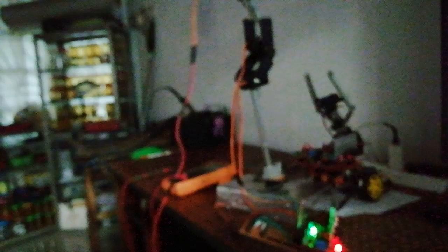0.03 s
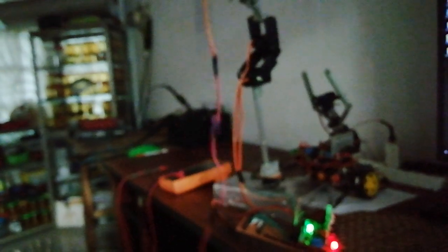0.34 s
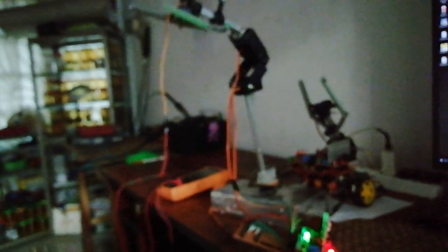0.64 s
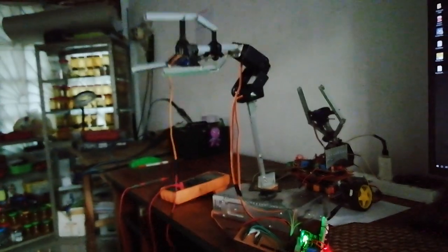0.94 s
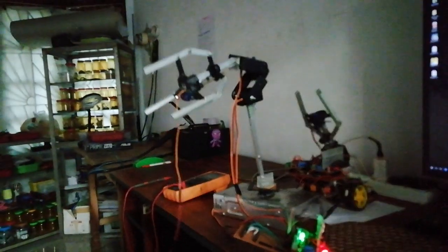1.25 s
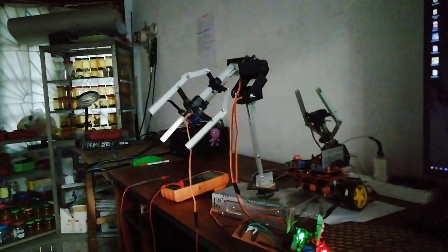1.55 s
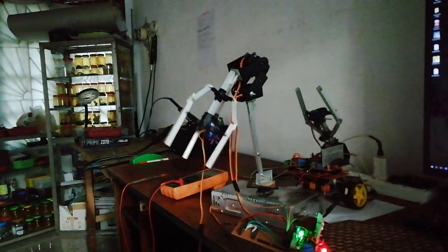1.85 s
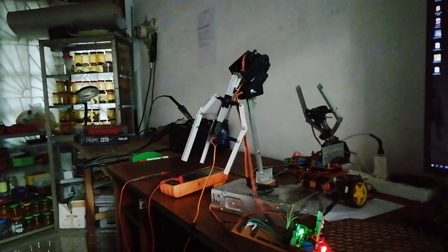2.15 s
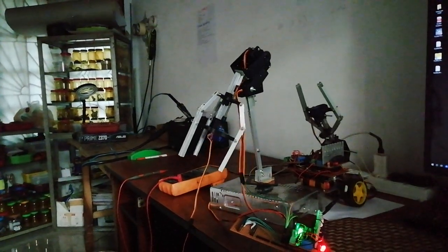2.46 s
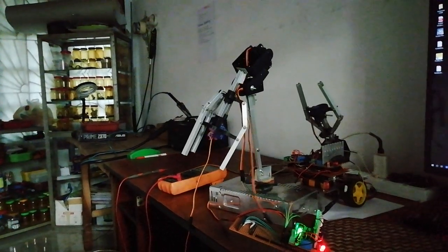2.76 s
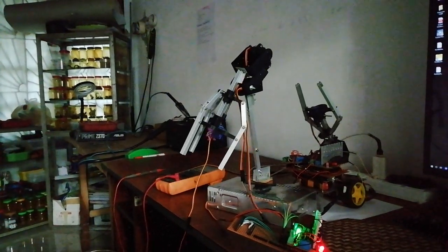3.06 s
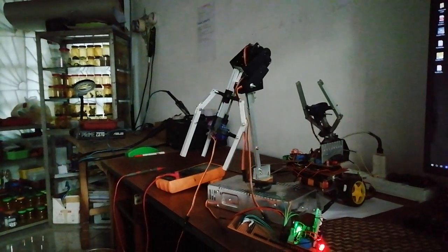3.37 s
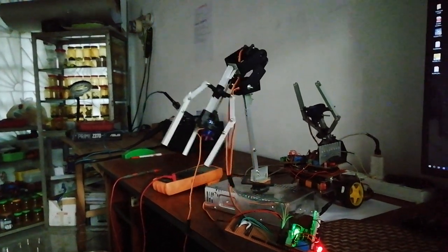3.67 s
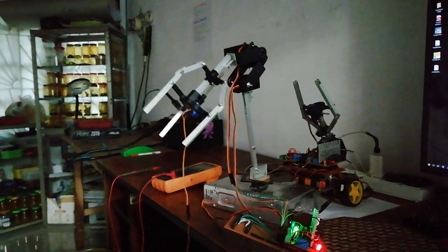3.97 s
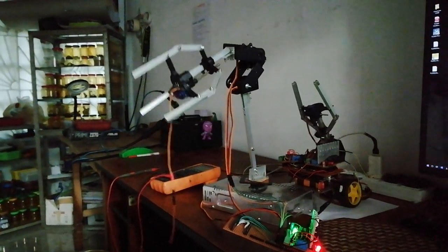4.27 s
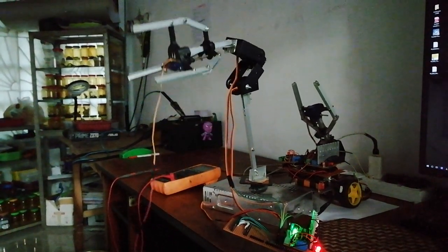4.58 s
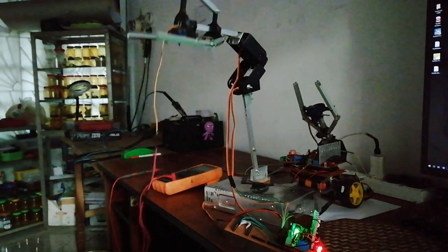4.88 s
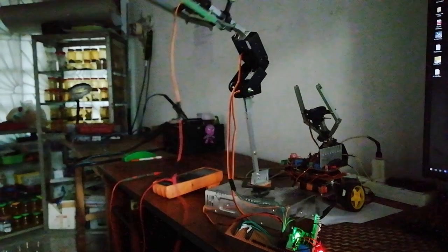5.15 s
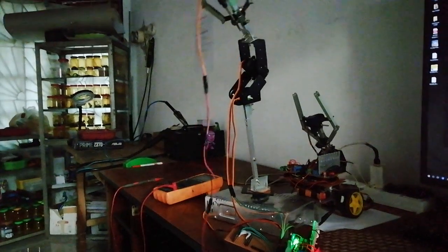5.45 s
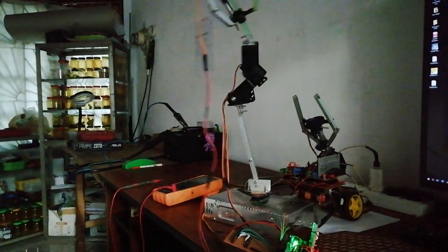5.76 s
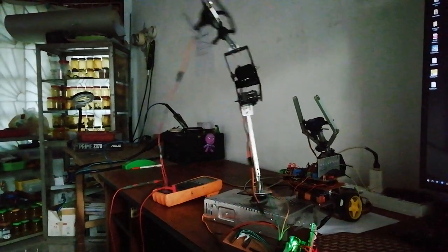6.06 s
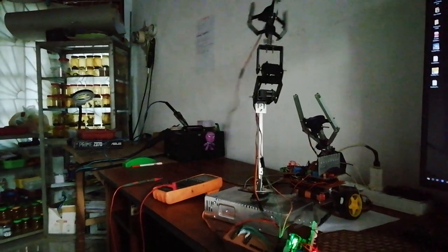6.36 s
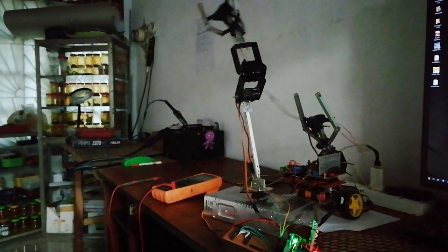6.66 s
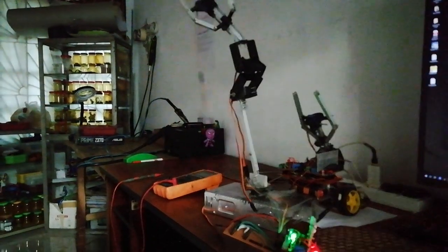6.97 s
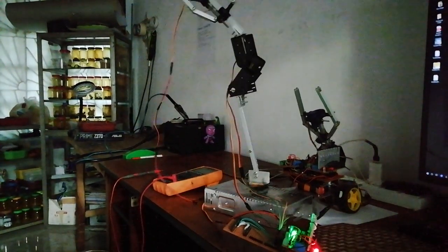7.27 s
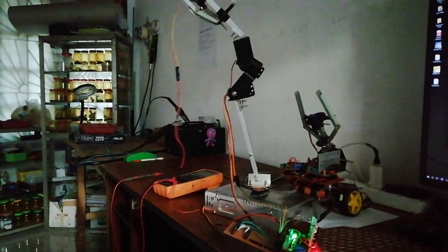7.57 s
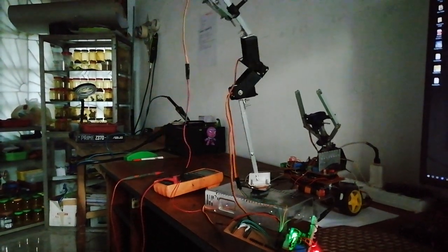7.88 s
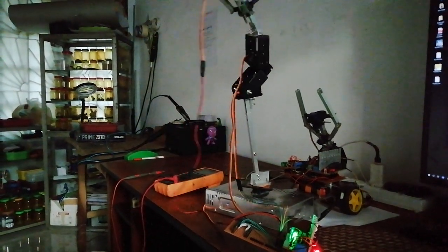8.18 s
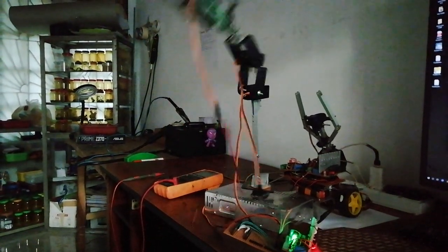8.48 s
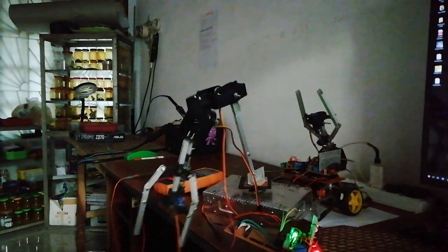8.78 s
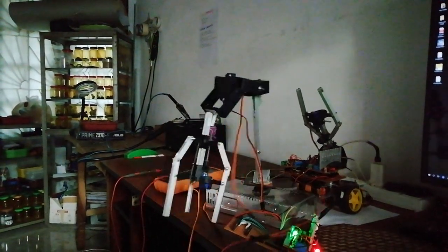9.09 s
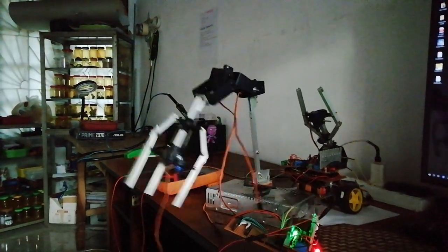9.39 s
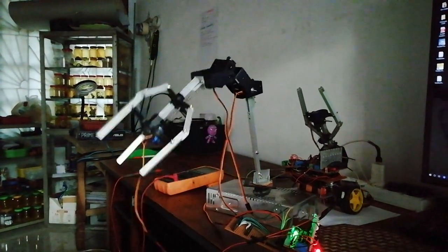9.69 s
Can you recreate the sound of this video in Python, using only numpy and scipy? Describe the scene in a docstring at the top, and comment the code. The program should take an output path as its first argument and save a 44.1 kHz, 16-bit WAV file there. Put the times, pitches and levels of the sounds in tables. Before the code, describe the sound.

A robot arm's little motors buzz slowly, then whine faster, squeak and knock against a desk, over a steady workshop hum.

```python
"""A hobby robot arm works on a desk in a small, bare-walled workshop, over a fan and mains hum.
First its servos creep, buzzing as gear-tooth impacts ring their cases. From about 4 s the loaded frame
drones; near 6 s a motor whines at speed, then the arm knocks lightly and its dry joints squeak.
After 8 s the arm swings down with more whines, knocks against its stop and thumps the desk."""
import sys
import numpy as np
from scipy import signal
from scipy.fft import rfft, irfft, next_fast_len
from scipy.io import wavfile
from scipy.ndimage import uniform_filter1d

SR = 44100
rng = np.random.default_rng(int(sys.argv[2]) if len(sys.argv) > 2 else 0)


def wav_out(sig):
    """Save sig, one row per channel (or a flat mono array), as 16-bit PCM at SR to the path in sys.argv[1]."""
    wavfile.write(sys.argv[1], SR, np.round(np.clip(np.atleast_2d(sig).T, -1, 1) * 32767).astype(np.int16))


N = 429093
TIME = np.arange(N) / SR
START_S, CUTOFF_HZ = 0.433, 15800

# frequency response of each servo case: frequency_hz, gain_db
ELBOW_RESPONSE = [(1470, -35), (2500, -34), (3370, -25), (3690, -26.5), (4300, -15), (4970, -17),
                  (6060, -17.5), (7740, 1), (8160, -4.5), (8550, -10), (9800, -23), (11200, -27.5),
                  (12300, -41), (15500, -52)]
GRIPPER_RESPONSE = [(1060, -52), (1800, -42), (2040, -22), (2400, -18), (2980, -28), (4590, -11),
                    (5260, -17), (5970, -11.5), (6890, -9), (7820, 0.5), (8870, -5), (9970, -21),
                    (12800, -34), (15500, -63)]
WRIST_RESPONSE = [(1760, -31), (3000, -4.5), (3390, -8), (4770, 2), (5460, -5.5), (7150, 3.5), (8750, 3.5),
                  (10900, -16), (15000, -27)]
BASE_RESPONSE = [(530, -57), (900, -18), (1030, -26), (1240, -26), (1740, -9), (1870, -23), (2080, -14),
                 (2710, -10.5), (3570, -16.5), (4280, -4.5), (5000, -6.5), (8780, 3), (11000, -21),
                 (13500, -20.5), (15800, -51)]
SHOULDER_RESPONSE = [(880, -52.5), (1500, -43), (2040, -30), (2220, -26), (3020, -22.5), (3790, -18.5),
                     (4350, -10.5), (4840, -9), (6080, -13.5), (8490, 4), (8920, -2.5), (9750, -17),
                     (11300, -20.5), (15800, -40.5)]
# servo movements: start_s, length_s, first_db, last_db, attack_s, release_s, servo
SERVO_MOVES = [(0.43, 1.468, -44.5, -44.5, 0.02, 0.23, "elbow"),
               (2.205, 0.43, -38.5, -32.5, 0.0073, .005, "gripper"),
               (3.146, 0.13, -37, -32.5, 0.0035, 0.1, "gripper"),
               (3.48, 0.13, -44, -35.5, 0.045, 0.058, "elbow"),
               (3.68, 0.43, -36, -39, 0.017, 0.15, "elbow"), (4.22, 0.987, -43, -41, 0.044, 0.052, "elbow"),
               (5.23, 0.84, -42.5, -40, 0.0083, 0.058, "elbow"),
               (5.595, 0.57, -26.5, -28.5, 0.056, 0.015, "base"),
               (6.2, 0.21, -43, -33.5, 0.025, 0.076, "wrist"), (6.66, 0.23, -46, -46, .02, 0.032, "wrist"),
               (7.0, 0.21, -42, -44, .05, 0.34, "wrist"), (7.5, 0.26, -47.5, -48.5, 0.02, 0.58, "wrist"),
               (7.92, 0.22, -43, -48, .08, 0.58, "wrist"), (8.315, 0.047, -40, -31, 0.011, .01, "shoulder"),
               (8.35, 0.23, -22.5, -28, 0.012, 0.055, "shoulder"),
               (8.655, 0.15, -19.5, -19.5, 0.017, 0.059, "shoulder"),
               (8.87, 0.26, -31, -28, .05, 0.086, "shoulder"),
               (9.22, 0.57, -32, -39, 0.068, 0.039, "shoulder")]


def servo(name, case, ticks_per_s, throb_db, grind_db, level_db, pan_db, surge_db=2.5):
    """Source and filter: teeth tick and grind against the case, harder on each 50 Hz drive pulse."""
    tooth_rate = ticks_per_s * np.exp(.07 * drift(20) + .1 * drift(300))
    strength = amp(2.2 * np.clip(rng.standard_normal(N), -2, 2))
    ticks = np.diff(np.floor(np.cumsum(tooth_rate) / SR), prepend=0) * strength
    contact = signal.lfilter([1], [1, -np.exp(-1 / (.0003 * SR))], ticks + 1e-18)   # 0.3 ms decay
    sliding = (.5 * unit_rms(contact) + amp(grind_db)) * rng.standard_normal(N)
    force = unit_rms(ticks) + sliding
    drive = amp(throb_db * np.cos(2 * np.pi * 50 * TIME) + surge_db * drift(10))
    gain = amp(level_db) * effort(SERVO_MOVES, name)
    return panned(gain * unit_rms(colour(force * drive, case)), pan_db)


# radiation response of the gearbox: frequency_hz, gain_db
GEARBOX_RESPONSE = [(1200, -25), (2100, -10.5), (2600, -11), (3300, -4), (3900, -3), (4400, 0), (6300, -7),
                    (8600, 0), (10000, -18), (15000, -36)]
# fast motor runs: start_s, length_s, first_mesh_hz, top_mesh_hz, spin_up_s, first_db, last_db,
# first_tilt_db_per_octave, top_tilt_db_per_octave, runout_depth
MOTOR_RUNS = [(5.65, .485, 1850, 2182, .09, -39, -34.5, 0, 1, .8),
              (8.353, .19, 1535, 2130, .075, -28.5, -38.5, 8, -4, .45),
              (8.66, .14, 1185, 1450, .145, -37, -34, 9, 6, .9),
              (8.79, .25, 5015, 5015, .1, -37, -40, 0, -6, .4),
              (9.505, .045, 4780, 4920, .05, -46, -43, 0, -6, .8),
              (9.7, .04, 5350, 5470, .015, -41, -39, 0, -6, .6)]


def gear_whine(run, flutter, roughness_rad, pinion_teeth=11):
    """Gear-mesh harmonics follow the motor's speed; an off-centre pinion modulates them into sidebands."""
    start, length, first_hz, top_hz, spin_up_s, first_db, last_db, first_tilt, top_tilt, depth = run
    attack_s, release_s = .024, .014
    on = (TIME > start) & (TIME < start + length + 10 * release_s)
    torque = np.exp(-(TIME[on] - start) / spin_up_s)
    mesh_hz = top_hz + (first_hz - top_hz) * torque
    tilt = top_tilt + (first_tilt - top_tilt) * torque
    phase = 2 * np.pi * np.cumsum(mesh_hz * (1 + flutter * drift(69)[on])) / SR
    rotor = phase / pinion_teeth
    phase = phase + roughness_rad * drift(500)[on]
    runout = np.cos(rotor) + np.cos(2 * rotor + 1) + .7 * drift(40)[on]
    out = np.zeros(N)
    for k in range(1, 9):
        hz = k * mesh_hz
        gain = amp(at_hz(GEARBOX_RESPONSE, hz) + tilt * np.log2(k / 2)) * (hz < CUTOFF_HZ)
        out[on] += gain * (1 + depth / k * runout) * np.sin(k * phase)
    return out * envelope(start, length, first_db, last_db, attack_s, release_s)


# normal modes of the arm and the desk: frequency_hz, level_db, t60_s
ARM_MODES = [(299, -12.5, 0.081), (517, -58, 0.027), (853, -7.5, 0.032), (1070, -2.5, 0.11),
             (1106, -6.5, 0.066), (1280, 14, 0.02), (1860, -2, 0.019), (1770, 6, 0.018),
             (2380, 16.5, 0.0061), (2780, 8, 0.013)]
DESK_MODES = [(76, -25, .15), (103, 1, 0.11), (133, -7.5, 0.18), (163, -3, 0.095), (215, -4, 0.085),
              (312, -4.5, 0.061)]
# blows of the arm: start_s, knock_db, contact_cutoff_hz, thump_db, gear_snap_db
IMPACTS = [(6.276, -20.5, 850, -60, -70), (6.409, -18, 895, -49, -45), (8.8, -26.5, 3000, -64, -8),
           (8.821, -10, 3600, -33, -23), (8.838, -35, 4000, -32, -21), (8.859, -18.5, 4000, -31.5, -21),
           (9.052, -17.5, 1770, -19, -35), (9.06, -39, 1000, -17.5, -33), (9.08, -57, 2000, -23, -16.5),
           (9.38, -40, 1970, -45, -43)]


def knocks(arm_db, desk_db, snap_db, crack_db, crack_s, snap_s):
    """Impact excitation: each blow cracks, rings the arm and desk, and snaps the slack in the gears."""
    out = np.zeros(N)
    crack_band = signal.butter(2, [850, 3300], "band", fs=SR, output="sos")
    snap_band = signal.butter(2, [4000, 10000], "band", fs=SR, output="sos")
    for start, knock_db, contact_hz, thump_db, gear_db in IMPACTS:
        on = (TIME >= start) & (TIME < start + .5)
        t = TIME[on] - start
        crack = signal.sosfilt(crack_band, np.exp(-t / crack_s) * rng.standard_normal(len(t)))
        snap = signal.sosfilt(snap_band, np.exp(-t / snap_s) * rng.standard_normal(len(t)))
        # a soft contact leaves only the hollow low modes
        contact = signal.butter(2, contact_hz, fs=SR, output="sos")
        knock = signal.sosfilt(contact, amp(arm_db) * struck(ARM_MODES, t) + amp(crack_db) * crack)
        thump = amp(thump_db + desk_db) * struck(DESK_MODES, t)
        out[on] += amp(knock_db) * knock + thump + amp(gear_db + snap_db) * snap
    return out


def struck(modes, t):
    """Free vibration: a sum of damped modes, alternating in sign and varying in strength."""
    out = 0
    for k, (hz, db, t60) in enumerate(modes):
        strength = (-1) ** k * amp(db + 2 * rng.standard_normal())
        out = out + strength * np.sin(2 * np.pi * hz * t) * np.exp(-np.log(1000) * t / t60)
    return out


# modes of each rubbing part: frequency_hz, width_hz, level_db
JOINT_MODES = {"base": [(4730, 330, -14.5), (5500, 130, -18), (6430, 150, -13.5), (6820, 160, -15),
               (7870, 320, -9.5), (8860, 540, -3.5), (10240, 930, -11), (12400, 81, -8.5),
               (13500, 600, -14), (15200, 100, -14)], "wrist": [(2330, 330, -18), (4550, 150, -15.5),
               (5250, 430, -7.5), (6470, 220, -7), (7060, 63, 4), (7655, 63, 9.5), (8900, 180, -12.5),
               (14200, 600, -23)], "backlash": [(2360, 210, -8.5), (4600, 186, -1), (5620, 830, -4),
               (7160, 630, 5.5), (8660, 620, 3.5)]}
# joint squeaks and gear backlash: peak_s, level_db, swell_s, part
FRICTION_BURSTS = [(6.29, -22, 0.0033, "base"), (6.332, -16, 0.0019, "base"),
                   (6.552, -39, .001, "backlash"), (6.565, -31, 0.0013, "backlash"),
                   (6.58, -38, .0015, "backlash"), (6.6, -38, .001, "backlash"),
                   (6.688, -18, 0.0038, "wrist"), (6.966, -15, 0.003, "wrist"),
                   (6.985, -30, 0.0043, "backlash"), (6.999, -24.5, 0.0041, "backlash")]


def squeaks(release_s, rasp_db, level_db):
    """Self-excited vibration: friction pumps up a joint's modes for a few milliseconds, then lets go."""
    out = np.zeros(N)
    rasp_band = signal.butter(3, [4200, 10000], "band", fs=SR, output="sos")
    for peak_s, db, swell_s, part in FRICTION_BURSTS:
        on = (TIME > peak_s - .01) & (TIME < peak_s + .04)
        t = TIME[on] - peak_s
        swell = np.exp(np.minimum(t / swell_s, -t / release_s))
        tone = amp(rasp_db) * signal.sosfilt(rasp_band, rng.standard_normal(len(t)))
        for hz, width_hz, mode_db in JOINT_MODES[part]:
            # a friction-driven mode holds its strength while its phase wanders
            wander = np.cumsum(rng.standard_normal(len(t))) * np.sqrt(2 * np.pi * width_hz / SR)
            tone += amp(mode_db) * np.sin(2 * np.pi * hz * t + uniform_filter1d(wander, size=32))
        out[on] += amp(db + level_db) * swell * unit_rms(tone)
    return out


# resonances of the frame: frequency_hz, nominal_width_hz, level_db
LOW_FRAME_MODES = [(372.4, 28, -5.5), (562, 57, 0.5), (794, 200, -3)]
HIGH_FRAME_MODES = [(1070, 64, -3.5), (2195, 380, -1.5)]
# spells of load on the frame: start_s, length_s, first_db, last_db, attack_s, release_s, mode_group
FRAME_LOADS = [(3.65, 1.97, -48.5, -50.5, 0.49, 0.41, "low"), (6.0, 2.66, -57.5, -61, 0.49, 0.1, "low"),
               (4.1, 1.4, -55, -64.5, .4, .1, "high"), (5.58, 0.045, -51, -43, 0.039, 0.025, "high"),
               (6.1, 0.059, -54, -42.5, 0.04, .04, "high"), (6.7, 1.64, -52.5, -56, 0.29, .2, "high")]


def frame_drone(low_db, high_db, pan_db):
    """Forced vibration: slow gears shake the frame's modes; the diffuse drone differs at each ear."""
    out = 0
    for modes, group, db in ((LOW_FRAME_MODES, "low", low_db), (HIGH_FRAME_MODES, "high", high_db)):
        shake = rng.standard_normal((2, N))
        body = 0
        for hz, width_hz, mode_db in modes:
            stage_width_hz = 1.33 * width_hz   # two stages in series narrow the peak again
            ringing = resonate(resonate(shake, hz, stage_width_hz), hz, stage_width_hz)
            body = body + amp(mode_db) * unit_rms(ringing)
        out = out + amp(db) * effort(FRAME_LOADS, group) * unit_rms(body)
    return out * ear_gains(pan_db)


# course of the fan and room rumble: time_s, level_db
RUMBLE_LEVELS = [(0.62, -58.5), (2.14, -54.5), (4.4, -56), (4.85, -53.5), (5.34, -57.5), (5.97, -55.5),
                 (6.46, -59), (8.3, -59.5)]
# spectra of the rumble and the moving air: frequency_hz, level_db
RUMBLE_SPECTRUM = [(18, -51), (30, -0.5), (54, -2), (75, -10.5), (97, -9.5), (129, -9.5), (178, -6.5),
                   (242, -12.5), (273, -25.5), (302, -18), (333, -22.5), (372, -16.5), (420, -39.5),
                   (550, -42), (920, -120)]
AIR_SPECTRUM = [(250, 0), (450, 0), (900, 1.5), (1700, 1), (3000, -9), (6000, -10), (8000, -5),
                (11000, -23.5), (15000, -28)]


def fan_noise(rumble_db, air_db, side_db):
    """Broadband flow noise: the fan's rumble, alike at both ears in the bass, under a steady hiss."""
    course_db, = in_time(RUMBLE_LEVELS)
    side = signal.sosfilt(signal.butter(2, 300, "high", fs=SR, output="sos"), rng.standard_normal(N))
    rumble = colour(rng.standard_normal(N) + amp(side_db) * side * [[1], [-1]], RUMBLE_SPECTRUM)
    air = colour(.5 * rng.standard_normal(N) + rng.standard_normal((2, N)), AIR_SPECTRUM)
    return amp(course_db + rumble_db) * unit_rms(rumble) + amp(air_db) * unit_rms(air)


# course of the fan throb and mains hum: time_s, throb_db, hum_db
TONE_LEVELS = [(0.5, -36.5, -55), (0.85, -45, -53), (1.3, -41.5, -46.5), (1.9, -50, -51), (2.7, -43, -52),
               (3.2, -65, -59), (3.7, -41.5, -57.0), (4.3, -63, -59), (5.5, -48.5, -60), (7.6, -54, -86),
               (8.5, -58.5, -76), (9.6, -46.5, -59)]


def throb_and_hum(level_db):
    """Tonal noise: the fan throbs near 47 Hz and the mains hum near 101 Hz, both wavering in pitch."""
    throb_db, hum_db = in_time(TONE_LEVELS)
    throb = amp(throb_db) * np.sin(2 * np.pi * np.cumsum(47 + 4 * drift(5.24)) / SR)
    hum = amp(hum_db) * np.sin(2 * np.pi * np.cumsum(101 + 1.01 * drift(2.5)) / SR)
    return amp(level_db) * (throb + hum)


# reverberation time of the workshop: frequency_hz, t60_s
REVERB_TIMES = [(100, 0.34), (400, 0.64), (1500, 0.38), (4000, 0.85), (8000, 0.15), (15000, 0.59)]


def room(x, wet_db, build_s=0.00067):
    """Reverberation: direct sound plus a diffuse tail that decays band by band; power is kept."""
    t = TIME[:int(.8 * SR)]
    edges_hz = np.geomspace(50, 18000, 9)
    tail = 0
    for low, high in zip(edges_hz, edges_hz[1:]):
        hz = np.sqrt(low * high)
        common, own = rng.standard_normal(len(t)), rng.standard_normal((2, len(t)))
        coherence = 1 / (1 + (hz / 450) ** 2)   # long waves reach both ears in step
        noise = np.sqrt(coherence) * common + np.sqrt(1 - coherence) * own
        band = signal.sosfilt(signal.butter(2, [low, high], "band", fs=SR, output="sos"), noise)
        tail = tail + band * np.exp(-np.log(1000) * t / at_hz(REVERB_TIMES, hz))
    tail = unit_rms(tail * (1 - np.exp(-t / build_s))) / np.sqrt(len(t))
    diffuse = signal.fftconvolve(x, tail, axes=1)[:, :N]
    return (x + amp(wet_db) * diffuse) / np.sqrt(1 + amp(wet_db) ** 2)


def envelope(start, length, first_db, last_db, attack_s, release_s):
    """Amplitude envelope: a linear rise, a steadily changing load, an exponential decay."""
    t = TIME - start
    load = amp(np.interp(t, [0, length], [first_db, last_db]))
    return load * np.clip(t / attack_s, 0, 1) * np.exp(-np.clip((t - length) / release_s, 0, 20))


def effort(events, part):
    """Incoherent addition: the envelopes of one part add in power."""
    return np.sqrt(sum(envelope(*row) ** 2 for *row, name in events if name == part))


def colour(x, spectrum):
    """Minimum-phase filter with the given spectrum, falling away below its first point."""
    size = 2 * next_fast_len(N // 2 + 4096)
    hz = np.arange(size // 2 + 1) * SR / size
    skirt = np.clip(hz / spectrum[0][0], .01, 1) ** 3
    cepstrum = irfft(np.log(amp(at_hz(spectrum, hz)) * skirt))[:size // 2]
    cepstrum[0] /= 2
    return irfft(rfft(x, size) * np.exp(rfft(2 * cepstrum, size)))[..., :N]


def resonate(x, hz, width_hz):
    """Two-pole resonance; white noise keeps its power."""
    r = np.exp(-np.pi * width_hz / SR)
    feedforward = np.sqrt((1 - r * r) / 2) * np.array([1, 0, -1])
    return signal.lfilter(feedforward, [1, -2 * r * np.cos(2 * np.pi * hz / SR), r * r], x + 1e-18)


def drift(rate_hz):
    """Random fluctuation: low-passed noise of unit spread."""
    step, settle = 40, 2000
    r = np.exp(-2 * np.pi * rate_hz * step / SR)
    slow = signal.lfilter([1], [1, -2 * r, r * r], rng.standard_normal(N // step + settle + 2))[settle:]
    return np.interp(np.arange(N) / step, np.arange(len(slow)), unit_rms(slow))


def panned(x, pan_db):
    """Interaural cues: a level difference, and a lag of one sample at the right ear."""
    return np.array([x, np.roll(x, 1)]) * ear_gains(pan_db)


def ear_gains(pan_db):
    """Interaural level difference, left minus right."""
    return amp(np.array([[.5], [-.5]]) * pan_db)


def at_hz(points, hz):
    """Interpolation on a log-frequency axis."""
    point_hz, value = np.transpose(points)
    return np.interp(np.log(np.maximum(hz, 1)), np.log(point_hz), value)


def in_time(rows):
    """Linear interpolation of each column over time."""
    time_s, *columns = np.transpose(rows)
    return [np.interp(TIME, time_s, column) for column in columns]


def amp(db):
    """Decibels to amplitude ratio."""
    return 10 ** (np.asarray(db) / 20)


def unit_rms(x):
    """Normalisation to unit power."""
    return x / np.sqrt(np.mean(x ** 2) + 1e-20)


def scene():
    """Superposition: servos, whines, knocks and squeaks reverberate over the drone, fan and hum."""
    buzz = servo("elbow", ELBOW_RESPONSE, ticks_per_s=530,
                 throb_db=3, grind_db=-12, level_db=2.3, pan_db=-5.8, surge_db=1.1)
    buzz += servo("gripper", GRIPPER_RESPONSE, ticks_per_s=800,
                  throb_db=4, grind_db=-12, level_db=-4, pan_db=-3)
    buzz += servo("wrist", WRIST_RESPONSE, ticks_per_s=300,
                  throb_db=7.5, grind_db=1, level_db=-3.5, pan_db=-2)
    buzz += servo("base", BASE_RESPONSE, ticks_per_s=1100,
                  throb_db=-.5, grind_db=-16, level_db=-1.5, pan_db=-2)
    buzz += servo("shoulder", SHOULDER_RESPONSE, ticks_per_s=670,
                  throb_db=4, grind_db=-6, level_db=1, pan_db=-2.5)
    whines = sum(gear_whine(run, flutter=.002, roughness_rad=.16) for run in MOTOR_RUNS)
    drone = frame_drone(low_db=-1.5, high_db=0, pan_db=-1)
    squeak = squeaks(release_s=.0024, rasp_db=-7, level_db=7)
    blows = knocks(arm_db=-13.5, desk_db=-5, snap_db=7.5, crack_db=6.5, crack_s=.0043, snap_s=.0013)
    arm = room(buzz, wet_db=5) + drone
    arm += room(panned(whines, -2.5), wet_db=-3)
    arm += room(panned(squeak, -1.7), wet_db=3)
    arm += room(panned(blows, -.33), wet_db=3.5)
    return arm + fan_noise(rumble_db=6, air_db=-55, side_db=-8) + throb_and_hum(level_db=.5)


# imbalance of the two microphones: frequency_hz, left_minus_right_db
MIC_DIFFERENCE = [(20, 0.5), (700, 0), (1200, -3), (2500, -1), (4500, 0.5), (6500, 5.5), (7500, 2),
                  (8500, -2), (11000, 0), (15000, -0.5)]


def record(dry):
    """Frequency response: two microphones differ in colour and open after a moment; the top is cut."""
    left = colour(dry[0], [(hz, db / 2) for hz, db in MIC_DIFFERENCE])
    right = colour(dry[1], [(hz, -db / 2) for hz, db in MIC_DIFFERENCE])
    lowpass = signal.ellip(10, .1, 80, CUTOFF_HZ, fs=SR, output="sos")
    return signal.sosfilt(lowpass, np.array([left, right]) * (TIME >= START_S))


dry = scene()
out = record(dry)
wav_out(out)
```